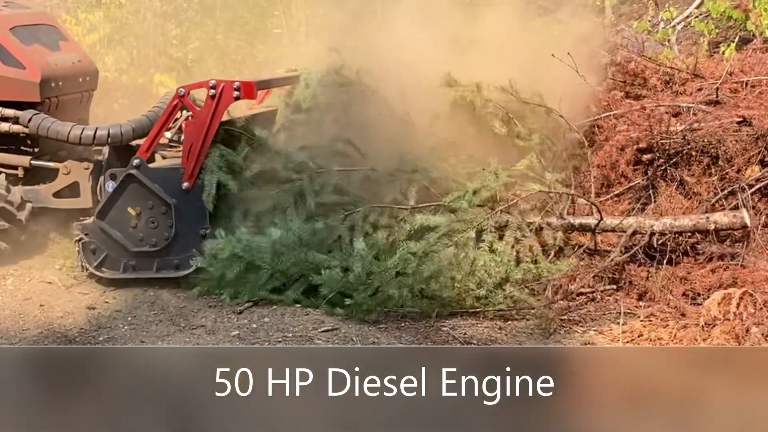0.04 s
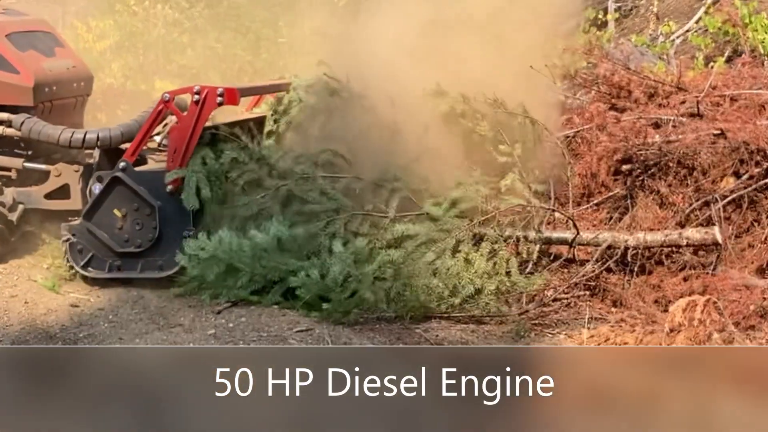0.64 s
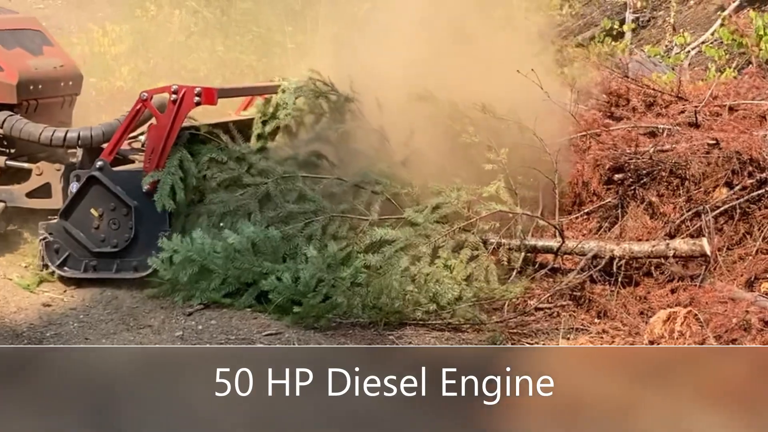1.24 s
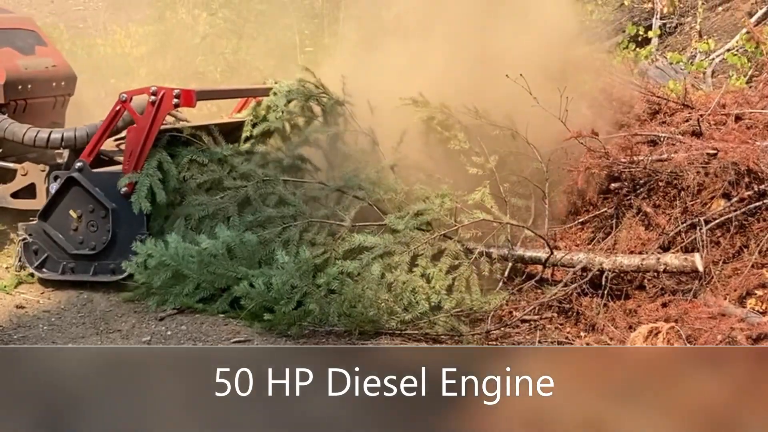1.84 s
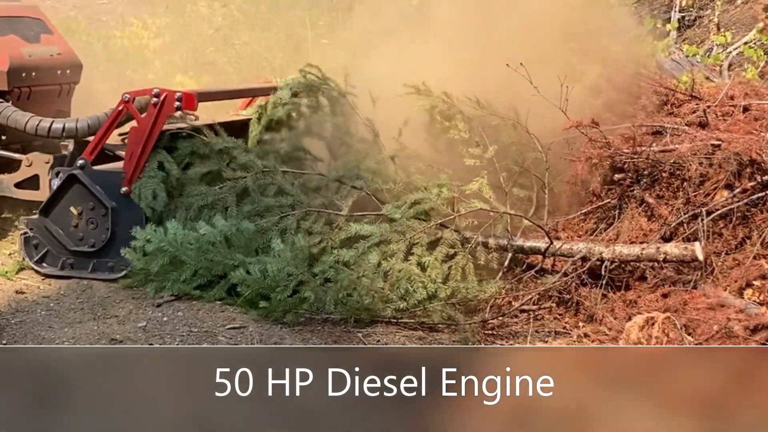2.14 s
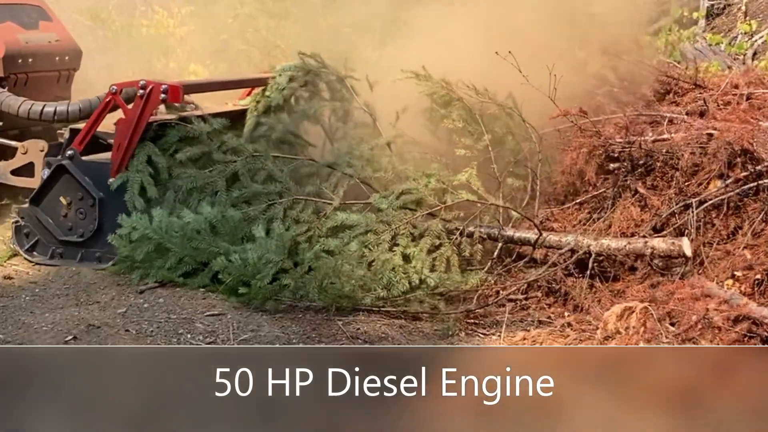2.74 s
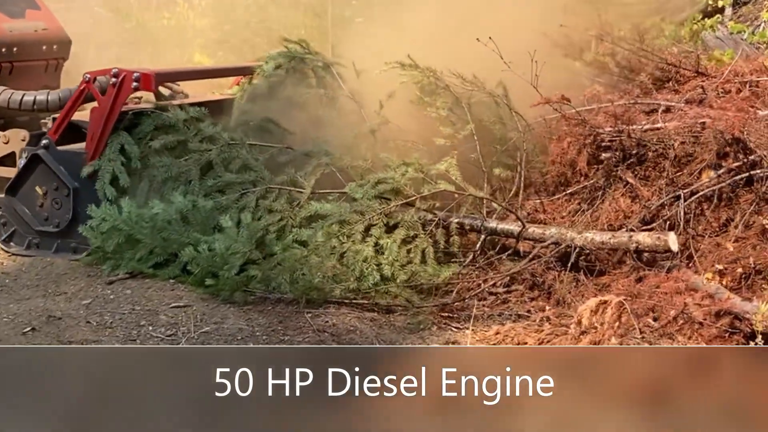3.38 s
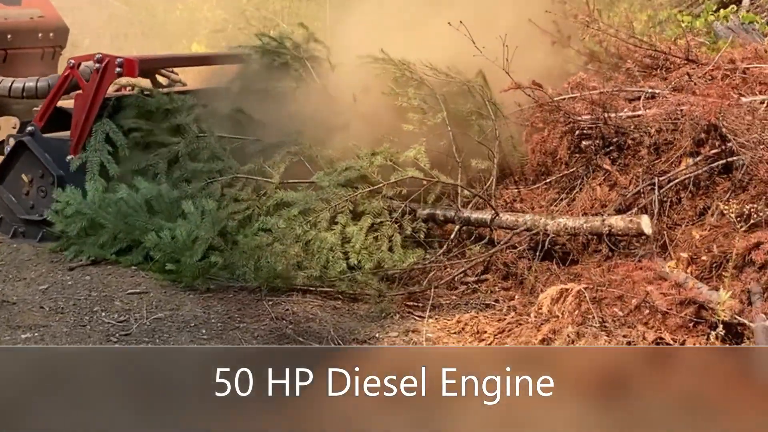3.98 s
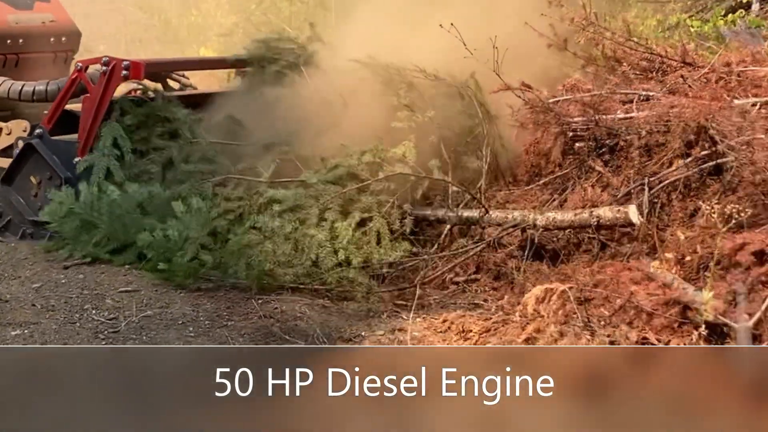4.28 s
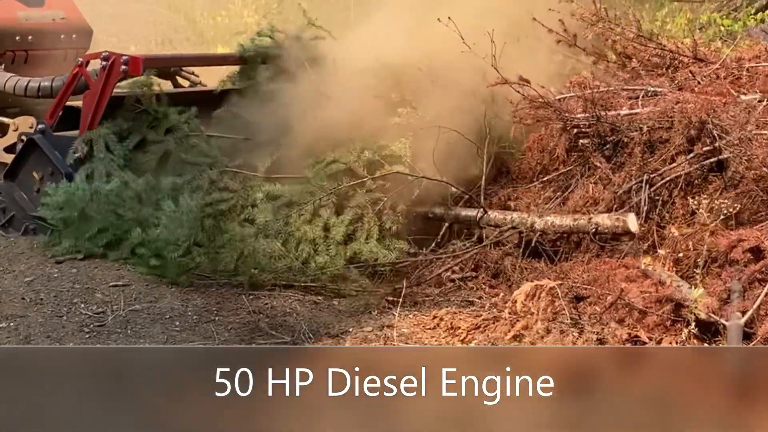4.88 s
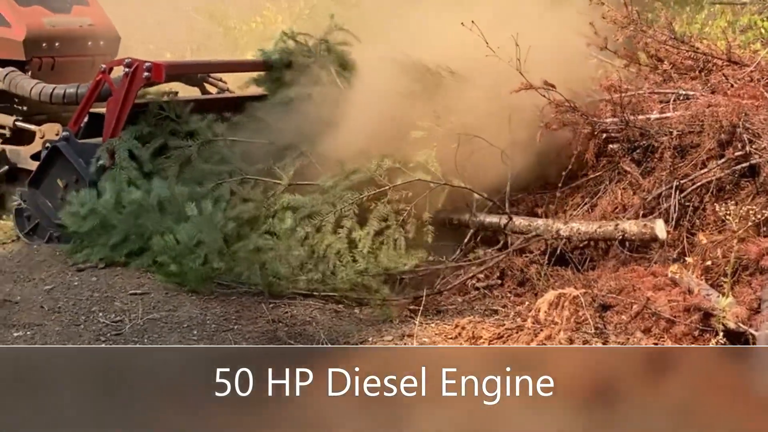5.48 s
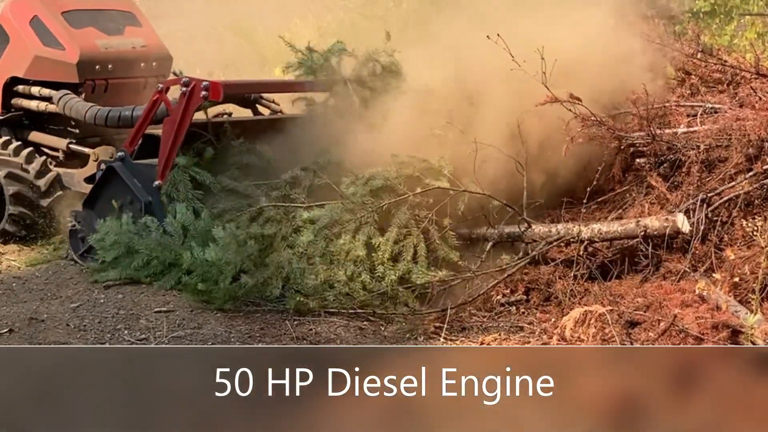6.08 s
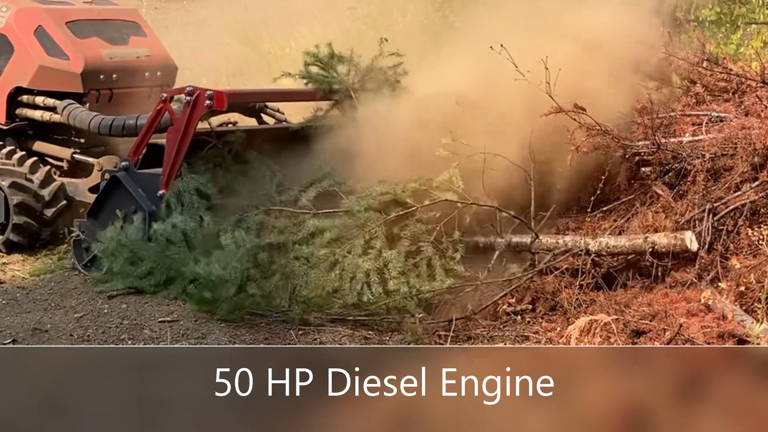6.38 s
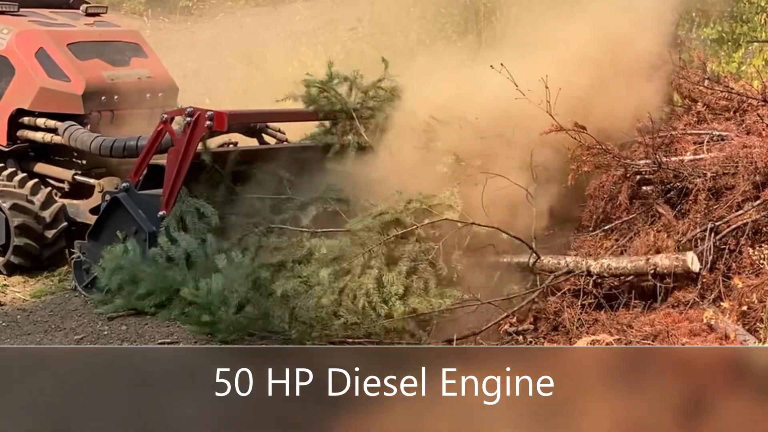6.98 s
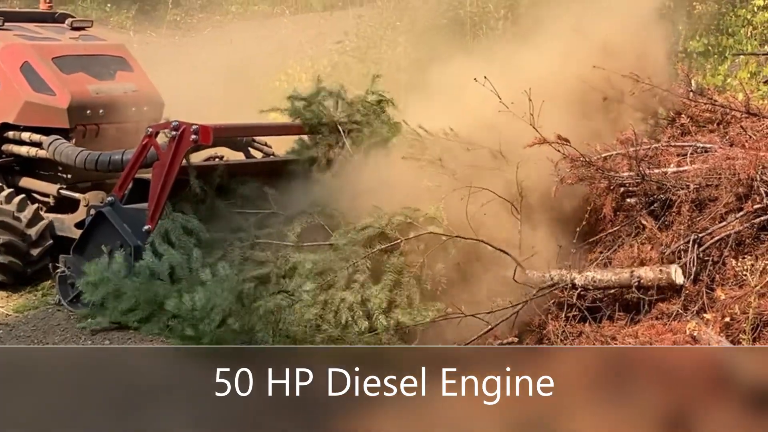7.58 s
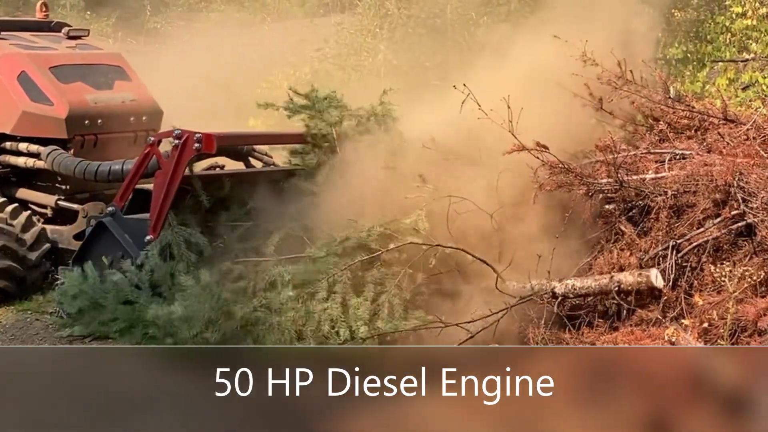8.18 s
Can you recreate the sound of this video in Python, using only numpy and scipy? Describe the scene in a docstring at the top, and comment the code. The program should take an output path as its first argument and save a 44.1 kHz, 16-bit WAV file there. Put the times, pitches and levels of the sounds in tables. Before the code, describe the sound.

A diesel brush mulcher works outdoors for about eight seconds, heard in wide stereo. Its spinning drum makes a rough hum and airy roar throughout, over a steady low engine note and a faint hydraulic whine. In the first second the drive growls briefly, and the engine note is strongest until about 2 seconds. The teeth tear fir needles in a fast crackling rasp, with scattered branch snaps up to 3.5 seconds. Wood grinds, chips hiss and the trunk groans in surges, at the start, near 2 seconds, from 3.6 to 4.7, near 6 and at the end. From 4 to 6 seconds thick branches crack and knock rapidly, ringing the steel hood. Afterwards the grinding continues with chattering wood, and a short louder rattle comes near 8 seconds. Faint metal tings and thin, high squeaks come and go, the squeaks more often after 5 seconds.

```python
"""The spinning drum of a diesel brush mulcher chews into a felled fir. Three rows of teeth take turns
at the wood, each biting once a turn: needles crackle, branches snap and knock in the steel hood.
Each armful of brush makes the trunk groan, the loose wood grind and the chips hiss out.
Underneath, the drum hums and roars, the diesel engine fires steadily, the hydraulics whine
and bare metal squeaks."""
import sys
import numpy as np
from scipy import signal
from scipy.fft import rfft, irfft, next_fast_len
from scipy.io import wavfile
from scipy.ndimage import map_coordinates

SR = 44100
rng = np.random.default_rng(int(sys.argv[2]) if len(sys.argv) > 2 else 0)


def write(x):
    x = np.atleast_2d(x).T
    wavfile.write(sys.argv[1], SR, np.round(np.clip(x, -1, 1) * 32767).astype(np.int16))


N = 362943
T = np.arange(N) / SR

# The rows of teeth, by name. Each entry: where in a turn it bites (0 to 1), its knock's top pitch in Hz.
TOOTH_ROWS = {"first": (.245, 4700), "second": (.645, 3600), "third": (.97, 2800)}
# The sound of tearing needles and splinters. Each row: frequency in Hz, relative level in dB.
TEAR_SPECTRUM = [(500, -30), (2000, -6), (3500, -1), (5000, -.5), (6300, .5), (8000, .8), (9300, -.5),
                 (11000, -1), (14000, -5), (16000, -5)]
# How strong the engine note is. Each row: time in seconds, relative level in dB.
ENGINE_LEVEL = [(0, -25), (1.0, -25.5), (2.0, -28.5), (2.9, -34), (4.1, -32.5), (5.1, -38.5), (6.3, -35),
                (8.23, -34)]
# The six times, in seconds, at which the overtone and whine tables give their levels.
LEVEL_TIMES = [.3, 1.6, 3.5, 5.3, 6.7, 7.9]


def amp(db):
    """Turn decibels into a factor to multiply by."""
    return 10 ** (np.asarray(db) / 20)


def unit(x):
    """Divide x by the root of its mean square. For a real signal this gives an average power of 1; for complex
    values, as in the hood's response, it scales and turns the phase by an arbitrary amount instead."""
    return x / np.sqrt(np.mean(x ** 2) + 1e-20)


def along(points, hz):
    """Read between (Hz, value) points on a logarithmic frequency scale."""
    frequencies, values = np.transpose(points)
    return np.interp(np.log(hz + 1), np.log(frequencies + 1), values)


def curve(points):
    """Join (seconds, value) points with straight lines, giving one value per sample."""
    return np.interp(T, *np.transpose(points))


def wobble(rate):
    """A smooth random curve through `rate` random values a second."""
    return map_coordinates(rng.standard_normal(int(N * rate / SR) + 4), [T * rate], order=2)


def filtered(x, response):
    """Change the strength and phase of each frequency in x by response(hz)."""
    size = next_fast_len(N + 8192)
    return irfft(rfft(x, size) * response(np.fft.rfftfreq(size, 1 / SR)), size)[..., :N]


def coloured(x, spectrum):
    """Shape x with a spectrum; white noise keeps its power."""
    return filtered(x, lambda hz: unit(amp(along(spectrum, hz))))


def muffled(x, top_hz):
    """Take away the frequencies above top_hz, as a soft contact does."""
    return filtered(x, lambda hz: 1 / np.sqrt(1 + (hz / top_hz) ** 12))


def gate(start, end, attack_s, release_s):
    """The loudness of one event: it rises, holds, then dies away."""
    return np.clip((T - start) / attack_s + .5, 0, 1) * np.exp(-np.maximum(T - end, 0) / release_s)


def swells(events, rest_db, attack_s, release_s):
    """Add (start, end, dB, ..) events to resting levels, giving one dB curve per level column."""
    power = amp(rest_db)[:, None] ** 2 * np.ones(N)
    for start, end, *levels in events:
        power = power + np.outer(amp(levels), gate(start, end, attack_s, release_s)) ** 2
    return 10 * np.log10(power)


def spikes(times, heights):
    """Silence with a one-sample spike at each of the times."""
    return np.bincount(np.clip(np.round(times * SR).astype(int), 0, N - 1), heights, N)


def bursts(times, db, rise_s, decay_s, tail_db, tail_s):
    """The loudness of a series of blows: a fast rise, a short tear, then a weak tail of flying chips."""
    t = np.arange(SR // 16) / SR
    rise = 1 - np.exp(-(t / rise_s) ** 2)
    shape = rise * (np.exp(-t / decay_s) + amp(tail_db) * np.exp(-t / tail_s))
    power = signal.fftconvolve(spikes(times, amp(db) ** 2), (shape / shape.max()) ** 2)[:N]
    return np.sqrt(np.abs(power))


def crackle(rate, share):
    """Two streams of tiny cracks, `rate` a second, carrying a share of the power; the rest is hiss."""
    cracks = (rng.random((2, N)) < rate / SR) * rng.laplace(size=(2, N))
    return np.sqrt(share) * unit(cracks) + np.sqrt(1 - share) * rng.standard_normal((2, N))


def whirl(turns, noise, share):
    """Mix noise with a buzz that repeats at every drum turn and carries a share of the power."""
    size = SR // 41
    one_turn = irfft(np.exp(2j * np.pi * rng.random((2, size // 2))), size * 8)
    buzz = np.array([np.interp(turns % 1, np.linspace(0, 1, len(wave)), wave) for wave in one_turn])
    return np.sqrt(share) * unit(buzz) + np.sqrt(1 - share) * noise


def tone(cycles, db, drift, flicker_db):
    """A slightly unsteady machine tone; `cycles` counts its waves and `drift` nudges that count."""
    strength = np.sqrt(2) * amp(db + flicker_db * wobble(3))
    return strength * np.sin(2 * np.pi * (cycles + drift * wobble(6)))


def overtones(cycles, rows):
    """Weaker tones at whole multiples of a base pitch, each with its own changing level."""
    return sum(tone(multiple * cycles, np.interp(T, LEVEL_TIMES, levels), drift=.06, flicker_db=1.5)
               for multiple, *levels in rows)


def drive(whine_hz=312, whine_db=-5):
    """The running gear growls and whines as the machine creeps forward at the start."""
    # How hard the drive pulls. Each row: time in seconds, growl level in dB.
    pull_level = [(0, -37.5), (.4, -37.5), (.8, -41.5), (1.4, -65), (2.5, -65)]
    # The low growl. Each row: frequency in Hz, relative level in dB.
    growl_spectrum = [(150, -47), (280, 6), (340, -2.5), (430, -3), (520, -21), (900, -47)]
    pull_db = curve(pull_level)
    growl = coloured(amp(pull_db + 1.5 * wobble(13.2)) * rng.standard_normal(N), growl_spectrum)
    return growl + tone(whine_hz * T, pull_db + whine_db, drift=.2, flicker_db=-1.5)


def hydraulics():
    """The hydraulics and drive whine at three pitches that wander a little."""
    # Each row: pitch in Hz, wander as a share of the pitch, then level in dB at each of LEVEL_TIMES.
    whines = [(312, .008, -42, -44, -42, -41, -46, -46), (589, .004, -41, -39, -44, -53, -53, -49),
              (633, .003, -39, -39, -40, -46, -45, -44)]
    out = np.zeros(N)
    for hz, wander, *levels in whines:
        cycles = np.cumsum(hz * (1 + wander * wobble(3))) / SR
        out += tone(cycles, np.interp(T, LEVEL_TIMES, levels), drift=.1, flicker_db=2)
    return out


def engine(firing_hz=67.7, gain_db=-2.5):
    """The diesel is held at a steady speed, so its firings blend into one low note."""
    # Each row: multiple of the firing rate, then level in dB at each of LEVEL_TIMES.
    engine_overtones = [(6, -37, -44, -47, -48, -46, -44), (12, -46, -44, -46, -42, -37.5, -37)]
    firings = np.cumsum(firing_hz * (1 + .002 * wobble(2))) / SR
    note = tone(firings, curve(ENGINE_LEVEL) + gain_db, drift=.018, flicker_db=.4)
    return note + overtones(firings, engine_overtones)


def squeaks(gain_db=2, swell_s=.035):
    """Bare metal squeaks: thin, unsteady tones that swell and fade."""
    # Each row: time of the peak in seconds, pitch in Hz, relative level in dB.
    metal_squeaks = [(.28, 8932, -45), (.42, 8932, -46), (.57, 8932, -44), (2.95, 8932, -48),
                     (3.23, 8932, -40), (3.22, 15262, -43), (5.28, 14512, -48), (5.75, 14512, -45),
                     (5.88, 15262, -46), (6.01, 14512, -42), (6.04, 15262, -44), (6.3, 15262, -49),
                     (6.7, 14512, -49), (6.86, 15262, -50), (7.06, 14512, -49), (7.21, 14512, -46),
                     (7.48, 15262, -45), (7.74, 15262, -47), (7.91, 14512, -44)]
    return sum(np.exp(-((T - peak) / swell_s) ** 2) * tone(hz * T, db + gain_db, drift=.54, flicker_db=-5)
               for peak, hz, db in metal_squeaks)


def tings(hits_per_s=7, decay_s=.05):
    """Grit hits the drum at random and leaves the steel ringing briefly."""
    # The notes of the steel. Each row: pitch in Hz, level in dB at the start, level in dB at the end.
    steel_notes = [(3436, -47, -55), (6231, -58, -55), (8932, -51, -56), (14512, -68, -55),
                   (15262, -57, -55)]
    out = np.zeros(N)
    for hz, first_db, last_db in steel_notes:
        hits = (rng.random(N) < hits_per_s / SR) * rng.uniform(.37, 1, N)
        ring = signal.lfilter([1], [1, -np.exp((2j * np.pi * hz - 1 / decay_s) / SR)], hits).imag
        out += amp(np.linspace(first_db, last_db, N)) * unit(ring)
    return out


def churned_air(turns, spray_db, rumble_db=-29.5, usual_engine_db=-33.5):
    """The drum churns air: a roar at the teeth, and a rumble that grows with engine note and chip flow."""
    # Air in the hood. Each row: frequency in Hz, relative level in dB.
    rumble_spectrum = [(15, -55), (30, -28), (45, -9), (62, -1), (100, -2), (150, 2), (250, -0.5),
                       (330, -2), (450, -55), (900, -47)]
    # Air at the teeth. Each row: frequency in Hz, relative level in dB.
    roar_spectrum = [(150, -40), (330, -6), (420, -2), (520, -2), (630, 0), (780, -.5), (950, -3.5),
                     (1300, -9), (2500, -30), (6000, -70)]
    # How loud the roar is. Each row: time in seconds, level in dB.
    roar_level = [(0, -24.5), (2, -26), (3.1, -26.5), (4.4, -24.5), (5.45, -28.5), (6, -27), (7.55, -28.5),
                  (8.1, -25)]
    swell_db = .24 * (curve(ENGINE_LEVEL) - usual_engine_db) + .23 * (spray_db - spray_db.mean())
    rumble = amp(rumble_db + swell_db + 1.27 * wobble(14)) * rng.standard_normal((2, N))
    roar = amp(curve(roar_level) + .84 * wobble(18)) * whirl(turns, crackle(700, share=.15), share=.16)
    return coloured(rumble, rumble_spectrum) + coloured(roar, roar_spectrum)


def drum_hum(turns, gain_db=-1):
    """The three rows of teeth beat the air unevenly and make a rough hum."""
    # How loud the hum is. Each row: time in seconds, relative level in dB.
    hum_level = [(0, -30), (1.15, -32.5), (1.5, -30), (1.75, -34), (2.3, -28.5), (3.5, -27.5), (4.05, -27),
                 (4.5, -28), (5.4, -31.5), (6, -28.5), (7, -29.5), (8.23, -29)]
    # Weaker tones that change as the cutting head swings.
    # Each row: multiple of the drum speed, then level in dB at each of LEVEL_TIMES.
    drum_overtones = [(2, -45, -45, -46, -46, -38, -37), (4, -43, -42, -41, -42, -36, -37),
                      (5, -44, -41, -42, -47, -37, -42), (6, -46, -39, -45, -46, -46, -45),
                      (7, -52, -50, -50, -45, -40, -42), (11, -46, -50, -50, -52, -49, -43),
                      (14, -43, -45, -41, -45, -47, -44), (16, -42, -41, -43, -48, -46, -46),
                      (25, -54, -52, -40, -51, -54, -45), (26, -54, -54, -45, -54, -56, -52),
                      (28, -52, -50, -38, -52, -56, -50), (30, -54, -52, -41, -52, -54, -52),
                      (29, -50, -54, -49, -52, -47, -46), (34, -46, -49, -48, -52, -56, -52),
                      (37, -48, -48, -46, -51, -55, -52), (41, -53, -54, -52, -50, -48, -47),
                      (44, -54, -50, -49, -51, -45, -50), (51, -52, -50, -49, -45, -43, -45)]
    hum = tone(len(TOOTH_ROWS) * turns, curve(hum_level) + gain_db, drift=.025, flicker_db=.6)
    return hum * (1 + .36 * wobble(50)) + overtones(turns, drum_overtones)


def hood(x):
    """The steel hood rings at its own pitches when x strikes it."""
    # Each row: pitch in Hz, width of the ringing band in Hz, relative level in dB.
    hood_notes = [(1080, 30, -3), (1165, 50, -2), (1240, 40, -5), (1400, 30, -5), (1460, 35, -2),
                  (1515, 30, -2), (1650, 70, -3), (1820, 160, -5), (1970, 70, 0), (2060, 70, 1),
                  (2190, 100, -1), (2280, 100, -3), (2430, 130, -3), (2580, 120, -5), (2710, 130, -5),
                  (3100, 500, -8), (4100, 1300, -6)]

    def response(f):
        ringing = sum(amp(db) * 1j * f * width / (hz * hz - f * f + 1j * f * width)
                      for hz, width, db in hood_notes)
        bass_cut = (1j * f / (900 + 1j * f)) ** 2
        return unit(ringing * bass_cut)
    return filtered(x, response)


def debris(turns, grinding_db, spray_db, rattle_db=-9, ring_db=-4, chips_db=-2.5, flutter_db=2.17):
    """Loose wood rattles round the hood, rings it and leaves as a spray of chips, in uneven handfuls."""
    # Grinding wood. Each row: frequency in Hz, relative level in dB.
    grind_spectrum = [(400, -40), (900, -7), (1150, 0), (1480, 0), (1750, -2), (2200, 0), (2750, -.5),
                      (3000, -9), (4000, -14), (5200, -22), (12000, -50)]
    # Hissing chips. Each row: frequency in Hz, relative level in dB.
    spray_spectrum = [(1500, -30), (3300, -4), (4400, .5), (5000, -2.5), (5600, -1), (8300, 1), (9300, -.5),
                      (11000, .5), (14000, -4), (16000, -3)]
    rattle = amp(grinding_db + rattle_db + flutter_db * wobble(120)) * crackle(1500, share=.66)
    hits = amp(grinding_db + ring_db) * whirl(turns, crackle(900, share=.47), share=.43)
    ring = muffled(hood(hits), top_hz=3780)
    handfuls_db = flutter_db * wobble(170) + 1.2 * wobble(21)
    chips = amp(spray_db + chips_db + handfuls_db) * crackle(4500, share=.45)
    return coloured(rattle, grind_spectrum) + ring + coloured(chips, spray_spectrum)


def chunks(grinding_db, gain_db=-4, count=900, centre_hz=1950, spread_octaves=.42, decay_cycles=20):
    """Coarse chunks clink on the hood, each at its own pitch, louder when there is more to grind."""
    starts = rng.integers(0, N, count)
    pitch, size = np.clip(rng.standard_normal((2, count, 1)), -2, 2)
    hz = centre_hz * 2 ** (spread_octaves * pitch)
    t = np.arange(SR // 30) / SR
    clinks = amp(4 * size) * np.sin(2 * np.pi * hz * t) * np.exp(-hz * t / decay_cycles)
    samples = (starts[:, None] + np.arange(len(t))).ravel()
    direction = rng.uniform(0, 2 * np.pi, (count, 1))
    pair = np.array([np.bincount(samples, (clinks * gain).ravel(), N)[:N]
                     for gain in (np.cos(direction), np.sin(direction))])
    return amp(grinding_db + gain_db) * unit(pair)


def groan(turns, groan_db, gain_db=-1, throb_db=2):
    """The trunk groans when pushed against the drum, throbbing as each row of teeth passes."""
    # Each row: frequency in Hz, relative level in dB.
    groan_spectrum = [(500, -40), (950, -12), (1080, -2), (1180, 1), (1340, -5), (1460, -1), (1640, -3),
                      (1850, -12), (3000, -45)]
    level_db = groan_db + gain_db + throb_db * np.cos(2 * np.pi * len(TOOTH_ROWS) * turns)
    return coloured(amp(level_db) * whirl(turns, crackle(900, share=.11), share=.087), groan_spectrum)


def chatter(turns, throb_db=5):
    """Pieces of wood chatter against the teeth once a turn, each ringing at its own pitch."""
    # Each row: start and end in seconds, pitch in Hz, width of the ringing band in Hz, level in dB.
    pieces = [(.12, 0.313, 1410, 90, -33), (0.486, .62, 1410, 160, -29.5), (2.05, 2.47, 2220, 70, -43),
              (2.49, 2.59, 1456, 50, -31.5), (3.63, 3.96, 2770, 600, -33), (4.005, 4.125, 3080, 200, -29),
              (4.333, 4.62, 2980, 500, -32.5), (4.04, 4.65, 1470, 30, -35), (4.042, 4.5, 1660, 35, -37),
              (4.66, 4.834, 2350, 400, -34), (4.88, 5.347, 2030, 120, -30.5),
              (5.67, 6.123, 2600, 350, -32.5), (5.763, 6.3, 1180, 35, -33), (6.25, 7.06, 2740, 110, -34),
              (7.205, 8.23, 2730, 110, -31.5), (7.72, 7.83, 2800, 400, -36), (7.94, 8.094, 1620, 130, -31),
              (8.033, 8.087, 1140, 200, -25), (8.07, 8.09, 1600, 300, -30)]
    throb = amp(throb_db * np.cos(2 * np.pi * (turns - TOOTH_ROWS["second"][0])))
    out = np.zeros((2, N))
    for start, end, hz, width_hz, db in pieces:
        rattle = throb * crackle(500, share=.7)
        ring = unit(signal.lfilter(*signal.iirpeak(hz, hz / width_hz, fs=SR), rattle))
        out += amp(db) * gate(start, end, attack_s=.037, release_s=.019) * ring
    return out


def snaps(turns, splinter_db=3, knock_db=-4):
    """Thick branches crack and knock on the hood; some spring back and are caught again on a later turn."""
    # Each row: start in seconds, number of cracks, turns between them, relative splinter and knock dB.
    branches = [(.078, 5, 4, -21, -26), (.29, 1, 1, -18, -30), (.576, 1, 1, -17, -23),
                (1.118, 1, 1, -16, -26), (1.487, 2, 4, -16, -24), (2.108, 1, 1, -19, -24),
                (2.22, 2, 4, -16, -24), (2.517, 1, 1, -18, -22), (2.613, 2, 7, -17, -26),
                (3.568, 1, 1, -19, -23), (3.832, 1, 1, -20, -26), (3.886, 1, 1, -20, -21),
                (4.043, 2, 5, -23, -17), (4.059, 1, 1, -19, -16), (4.330, 1, 1, -20, -14),
                (4.193, 2, 1, -21, -24), (4.381, 1, 1, -27, -20), (4.662, 1, 1, -23, -15),
                (4.463, 1, 1, -17, -14.5), (4.496, 1, 1, -20, -12), (4.531, 2, 1, -24, -15),
                (4.589, 2, 3, -23, -15), (4.838, 1, 1, -22, -17), (4.861, 3, 1, -18, -15),
                (4.937, 1, 1, -17, -12), (4.963, 1, 1, -22, -18), (5.136, 1, 1, -20, -18),
                (5.161, 1, 1, -23, -15), (5.186, 1, 1, -18, -22), (5.226, 1, 1, -26, -16),
                (5.284, 1, 1, -20, -19), (5.309, 1, 1, -18, -14), (5.334, 1, 1, -20, -21),
                (5.398, 1, 1, -22, -14), (5.408, 1, 1, -22, -20), (5.597, 2, 2, -22, -15.5),
                (5.754, 1, 1, -17, -13), (5.779, 1, 1, -26, -19), (5.847, 1, 1, -22, -19),
                (5.921, 1, 1, -18, -19), (5.961, 1, 1, -27, -15), (6.103, 1, 1, -23, -15)]
    cracks = [(np.interp(start, T, turns) + k * apart, splinter, knock)
              for start, count, apart, splinter, knock in branches for k in range(count)]
    at_turns, splinter_levels, knock_levels = np.transpose(cracks)
    times = np.interp(at_turns, turns, T)
    shape = dict(rise_s=.0005, decay_s=.0014, tail_db=-18, tail_s=.006)
    splinters = bursts(times, splinter_levels + splinter_db, **shape) * crackle(5200, share=.045)
    knocks = bursts(times, knock_levels + knock_db, **shape) * crackle(7100, share=1)
    return coloured(splinters, TEAR_SPECTRUM) + muffled(hood(knocks), top_hz=3400)


def teeth(turns, jitter_s=.00014, scatter_db=1.8, tear_db=-1, chop_db=-2, rasp_db=-3, ring_db=-12):
    """Each row of teeth bites once a turn: a short tear of needles and a dry chop that rings the hood."""
    # Boughs lying against the drum.
    # Each row: name of the tooth row, start and end in seconds, relative needle and wood levels in dB.
    boughs = [("first", 0, 0.62, -19.5, -36), ("first", 0.668, 2.0, -18, -29),
              ("first", 2.05, 2.85, -16, -26), ("first", 2.9, 3.55, -17.5, -23),
              ("first", 3.6, 4.09, -17.5, -21), ("first", 4.2, 4.38, -17, -19),
              ("first", 4.51, 4.59, -30, -20), ("first", 4.72, 4.82, -23.5, -15),
              ("first", 5.01, 5.07, -16.5, -20.5), ("first", 5.22, 5.27, -28, -19),
              ("first", 5.55, 5.66, -23, -21.5), ("first", 5.8, 5.92, -25, -19.5),
              ("first", 5.4, 6.6, -25, -40), ("second", 0.3, 0.62, -31, -33),
              ("second", 0.7, 2.2, -18.5, -35), ("second", 4.0, 3.8, -20, -16),
              ("second", 4.37, 4.69, -22.5, -16.5), ("second", 4.85, 5.0, -18, -14.5),
              ("second", 5.03, 5.37, -18.5, -21), ("second", 5.43, 5.62, -19, -20.5),
              ("second", 5.7, 5.82, -22.5, -18), ("second", 5.94, 6.12, -23, -16.5),
              ("third", 2.4, 3.2, -29, -31), ("third", 3.65, 4.05, -28, -32),
              ("third", 5.9, 7.4, -26, -22.5), ("third", 7.5, 8.23, -21.5, -20)]
    # Stray twigs between boughs: relative needle level and wood level in dB.
    twig_levels = (-51, -42.5)
    # A tooth chopping wood. Each row: frequency in Hz, relative level in dB.
    chop_spectrum = [(400, -30), (1100, -1.5), (1600, -1.5), (2050, 1), (2400, -1), (3000, -3.5),
                     (4500, -14), (8000, -14)]
    tear_power, knocks = np.zeros(N), np.zeros((2, N))
    t = np.arange(SR // 60) / SR
    for name, (angle, top_hz) in TOOTH_ROWS.items():
        in_reach = [bough[1:] for bough in boughs if bough[0] == name]
        needle_level, wood_level = swells(in_reach, twig_levels, attack_s=.015, release_s=.015)
        lateness, force = rng.standard_normal((int(turns[-1]), 2)).T
        times = np.interp(np.arange(len(force)) + angle, turns, T)
        needle_db = np.interp(times, T, needle_level) + scatter_db * force
        wood_db = np.interp(times, T, wood_level) + scatter_db * force
        tear_power += bursts(times + jitter_s * lateness, needle_db + tear_db,
                             rise_s=.0008, decay_s=.0015, tail_db=-10.5, tail_s=.007) ** 2
        blows = bursts(times, wood_db + chop_db, rise_s=.0009, decay_s=.0016, tail_db=-14, tail_s=.006)
        chop = blows * crackle(5000, share=.3)
        # The same tooth cuts the same groove each turn, so part of the knock repeats and rasps.
        groove = unit(rng.standard_normal(len(t))) * (t / .0008) * np.exp(1 - t / .0008)
        rasp = signal.fftconvolve(spikes(times, amp(wood_db + rasp_db)), groove)[:N]
        knocks += muffled(chop + rasp, top_hz)
    needles = coloured(np.sqrt(tear_power) * crackle(9000, share=.35), TEAR_SPECTRUM)
    return needles + coloured(knocks, chop_spectrum) + amp(ring_db) * hood(knocks)


def wide_stereo(pair):
    """Make a very wide sound: left and right differ in phase, level and likeness, depending on pitch."""
    # Each row: frequency in Hz, how alike left and right are (0 to 1).
    likeness = [(35, 0.22), (70, 0.33), (130, 0.77), (250, 0.92), (400, 0.99), (1000, 0.9), (1400, 0.42),
                (1850, 0.61), (2200, 0.95), (3000, 0.84), (4800, 0.51), (5600, 1), (6600, 0.66),
                (10500, 0.97), (11800, 1), (13500, 0.74)]
    # Each row: frequency in Hz, roughly how far the left wave runs ahead of the right in radians.
    left_lead = [(0, -.5), (130, -1), (200, -1.5), (260, -2.5), (330, -3.15), (1000, -3.5), (1450, -4.1),
                 (1700, -5.8), (2000, -5.2), (2200, -3.2), (2750, -4), (4200, -4.3), (5100, -3.3),
                 (5900, -3.05), (8300, -.1), (9000, .1), (11500, 3.05), (12300, 3.2), (14400, 6.2)]
    # Each row: frequency in Hz, level of the left against the right in dB.
    left_level = [(40, 2), (70, -3.5), (120, -10.5), (190, -18), (250, -17), (310, -8), (390, 0), (1450, 0),
                  (1650, -1), (2000, -4.5), (2250, -0.5)]

    def mix(hz, side):
        blend = np.arccos(np.clip(along(likeness, hz), -1, 1)) / 2
        lead = np.interp(hz, *np.transpose(left_lead))
        return np.array([np.cos(blend), side * np.sin(blend)]) * np.exp(.5j * side * lead)
    left = filtered(pair, lambda hz: mix(hz, .95) * amp(along(left_level, hz))).sum(0)
    right = filtered(pair, lambda hz: mix(hz, -.98)).sum(0)
    return np.array([left, right])


def spread_bass(stereo, top_hz=108):
    """The deep bass starts in the middle and then spreads to the sides."""
    # Each row: time in seconds, width as a factor (1 leaves it as it is).
    bass_width = [(0, 0.059), (1.1, 0.15), (2.0, 2.1), (8.23, 1.6)]
    side = muffled(stereo[0] - stereo[1], top_hz) / 2 * (curve(bass_width) - 1)
    return stereo + np.array([side, -side])


def scene():
    """The drum's turning times the bites, snaps and hum; each armful swells groan, grinding and spray."""
    # Each row: time in seconds, drum speed in turns a second.
    drum_speed = [(0.0, 40.24), (0.4, 40.3), (1.3, 40.82), (1.95, 40.89), (2.7, 40.67), (3.3, 40.97),
                  (3.8, 40.84), (4.65, 40.05), (5.5, 40.55), (6.4, 39.66), (7.3, 40.05), (8.23, 40.31)]
    # Brush pressed into the drum.
    # Each row: start and end in seconds, then relative groan, grinding and spray levels in dB.
    armfuls = [(0, .65, -33, -36.5, -28.5), (.7, 1.95, -64, -35, -34.5), (2.0, 2.3, -35.5, -33, -26),
               (2.3, 3.55, -48, -38.5, -31.5), (3.6, 3.98, -33, -34.5, -28), (4.0, 4.14, -30.5, -33, -24),
               (4.3, 4.66, -27.5, -34, -27), (4.7, 5.6, -40, -39, -54), (5.77, 6.08, -31, -31, -27),
               (6.2, 7.2, -61, -35.5, -31), (7.7, 8.23, -35, -35.5, -28), (8.03, 8.09, -29, -46, -45)]
    # The trickle between armfuls: relative groan, grinding and spray levels in dB.
    trickle_levels = (-51, -32.5, -33)
    # Part of the machine's tones reaches both sides in step. Each row: frequency in Hz, gain in dB.
    centre_gain = [(380, -18.5), (600, -14), (800, -10), (1050, -10), (1400, -18.5)]
    turns = np.cumsum(curve(drum_speed)) / SR
    # The hood fills quickly and clears more slowly.
    groan_db, grinding_db, spray_db = swells(armfuls, trickle_levels, attack_s=.044, release_s=.23)
    wood = teeth(turns) + snaps(turns) + chatter(turns) + groan(turns, groan_db)
    loose_wood = debris(turns, grinding_db, spray_db) + chunks(grinding_db)
    air = churned_air(turns, spray_db)
    machine = engine() + drum_hum(turns) + hydraulics() + tings() + squeaks()
    wide = wide_stereo(wood + loose_wood + air + np.array([machine, np.zeros(N)]))
    centre = filtered(machine, lambda hz: amp(along(centre_gain, hz))) + drive()
    return spread_bass(wide) + centre


def record(dry, top_hz=15800):
    """Cut off the very highest treble, above top_hz."""
    return filtered(dry, lambda hz: 1 / (1 + np.exp(np.clip((hz - top_hz) / 20, -60, 60))))


dry = scene()
out = record(dry)
write(out)
```